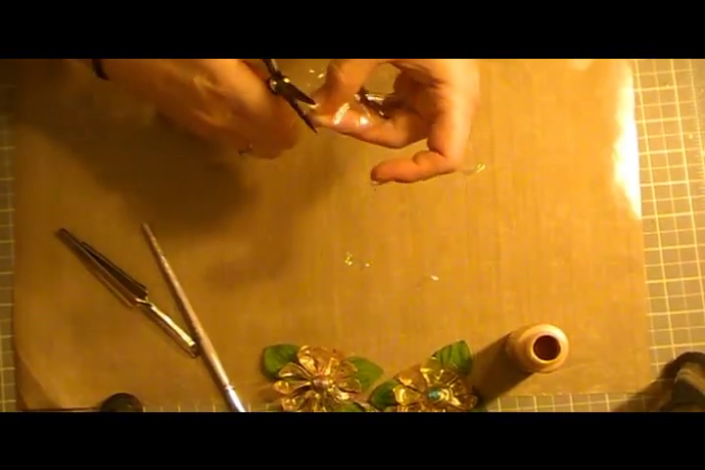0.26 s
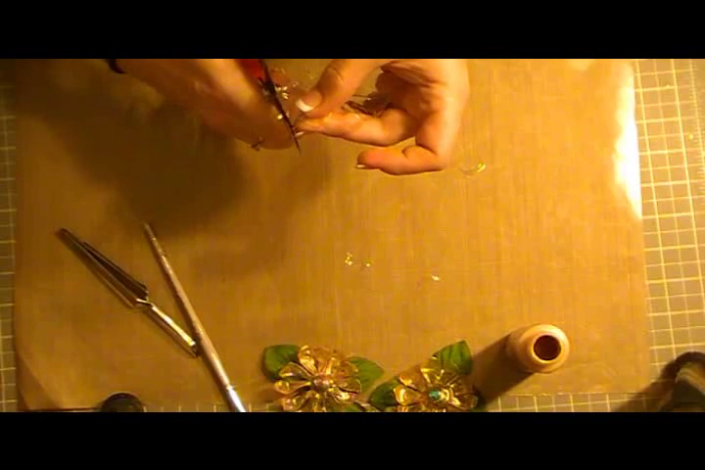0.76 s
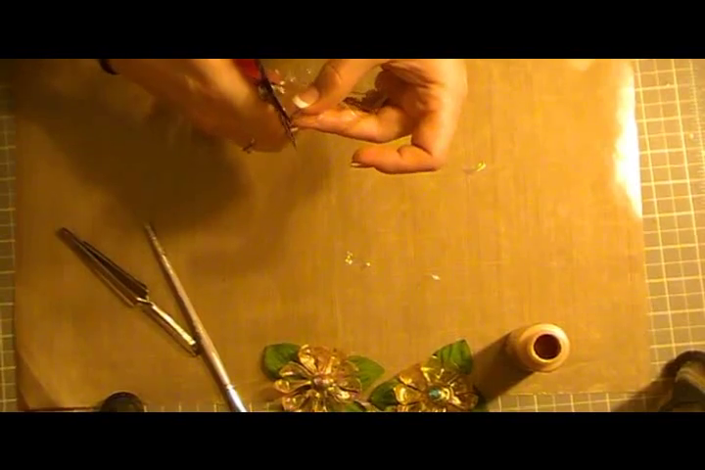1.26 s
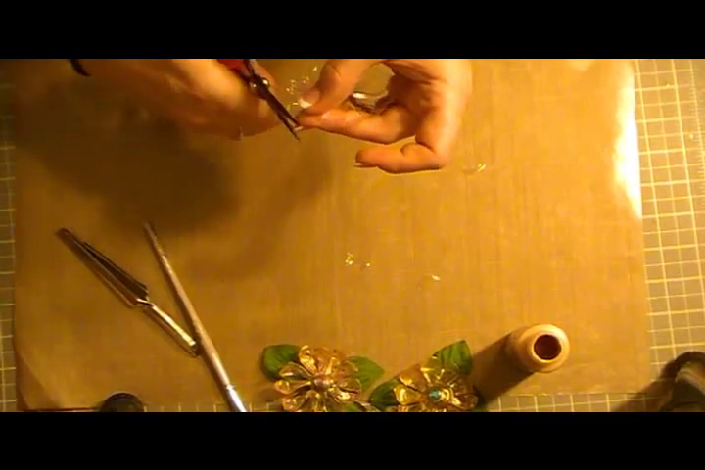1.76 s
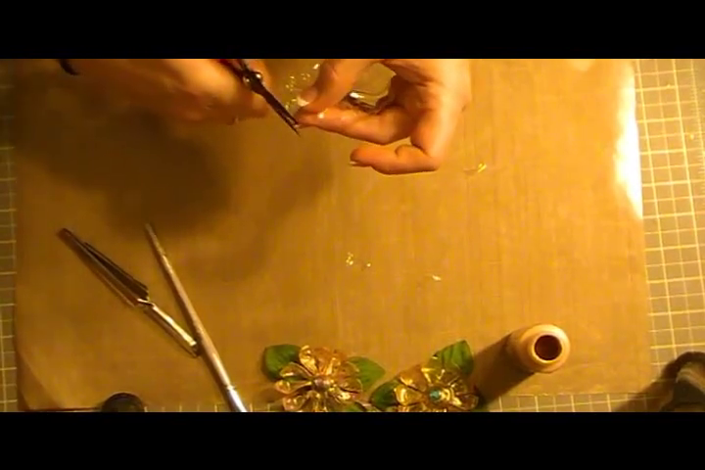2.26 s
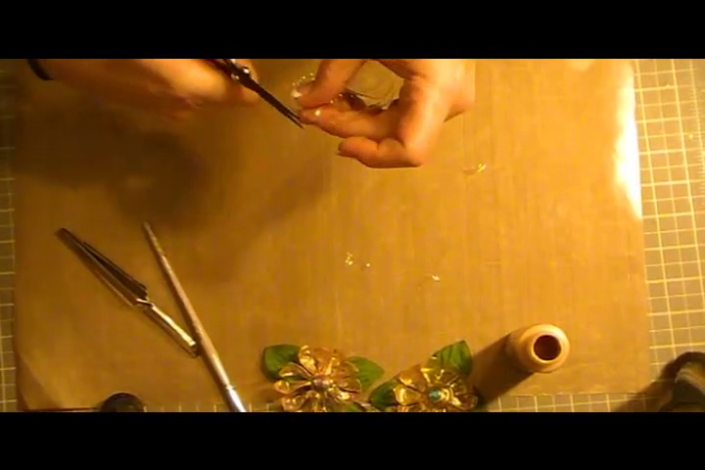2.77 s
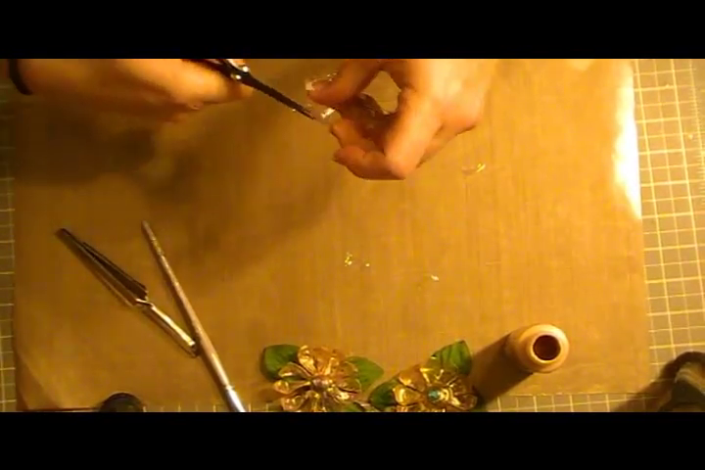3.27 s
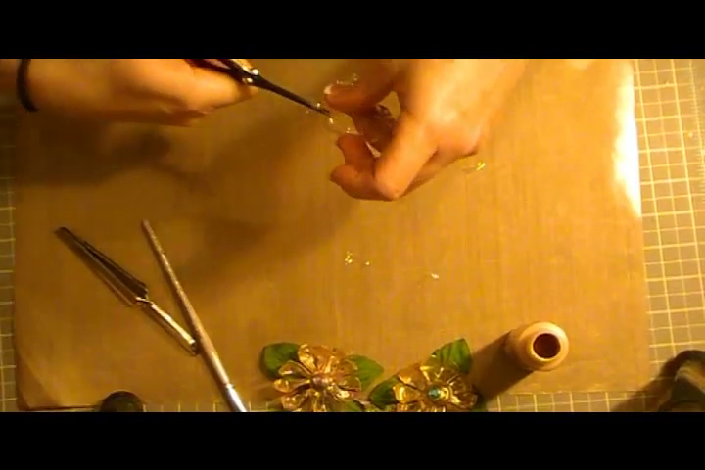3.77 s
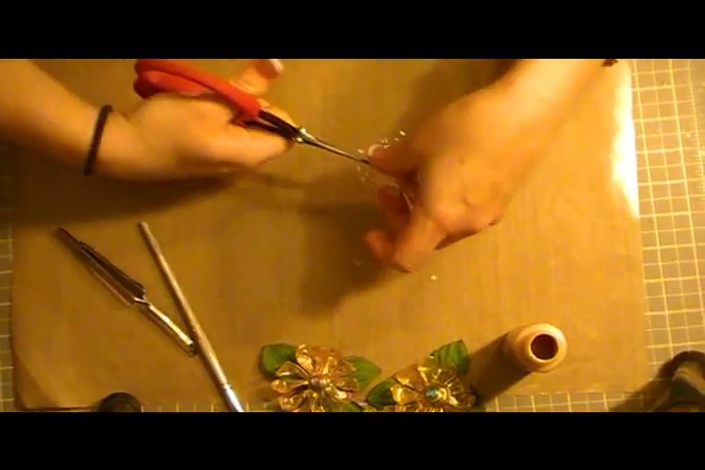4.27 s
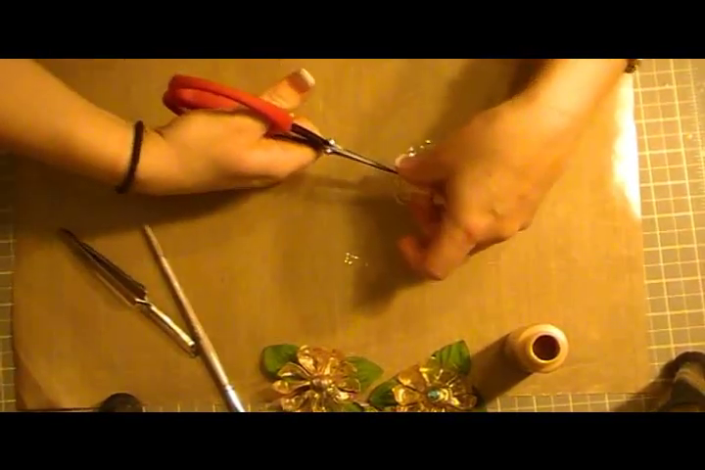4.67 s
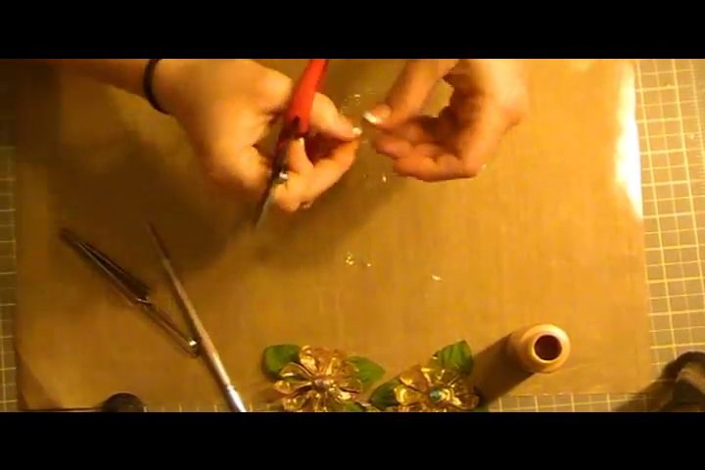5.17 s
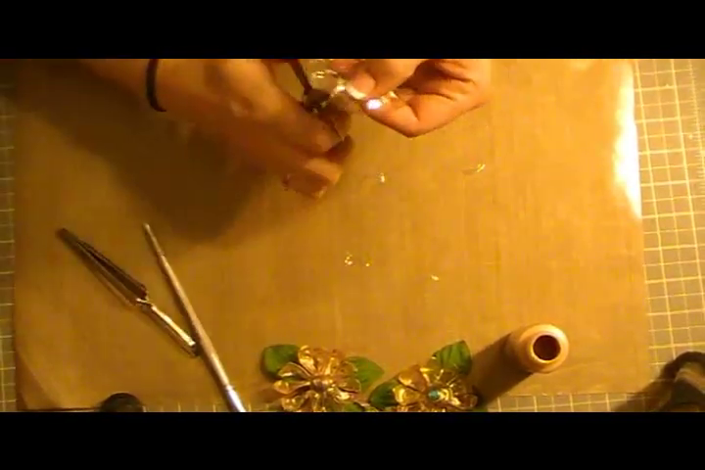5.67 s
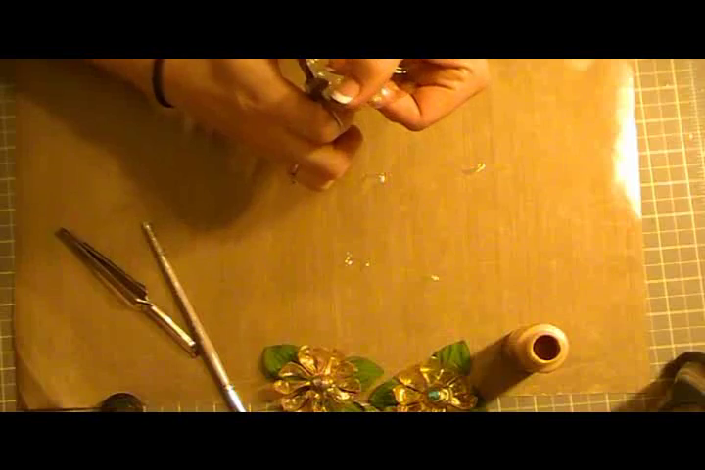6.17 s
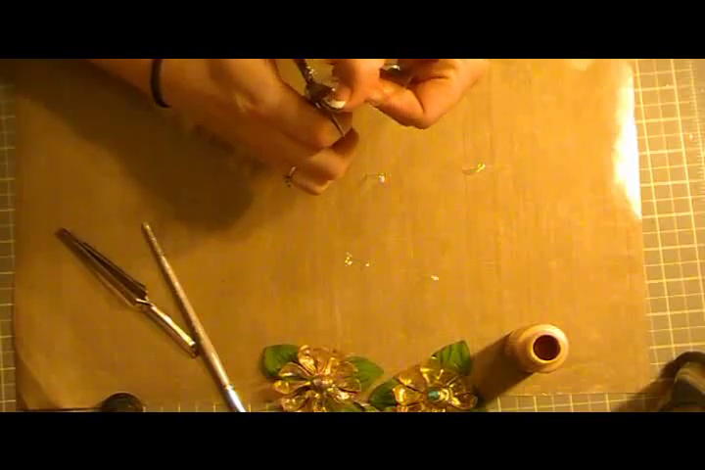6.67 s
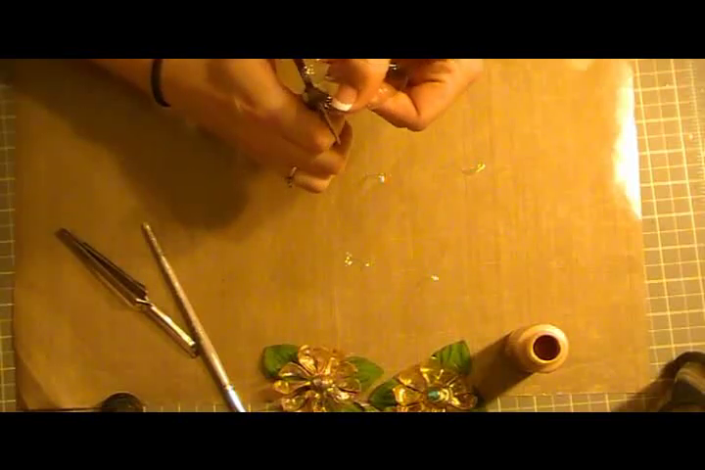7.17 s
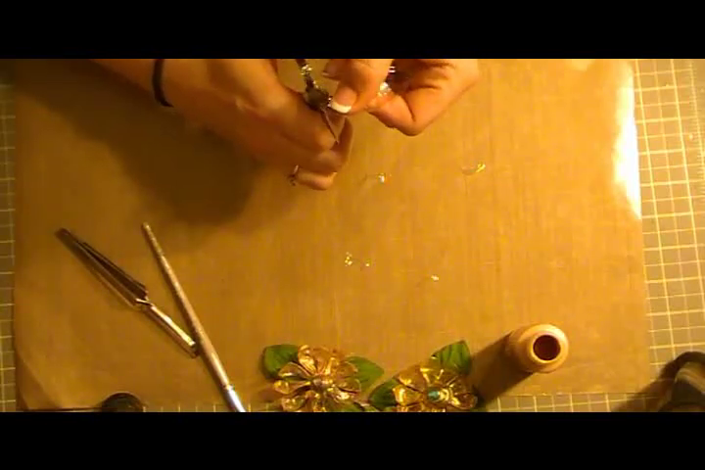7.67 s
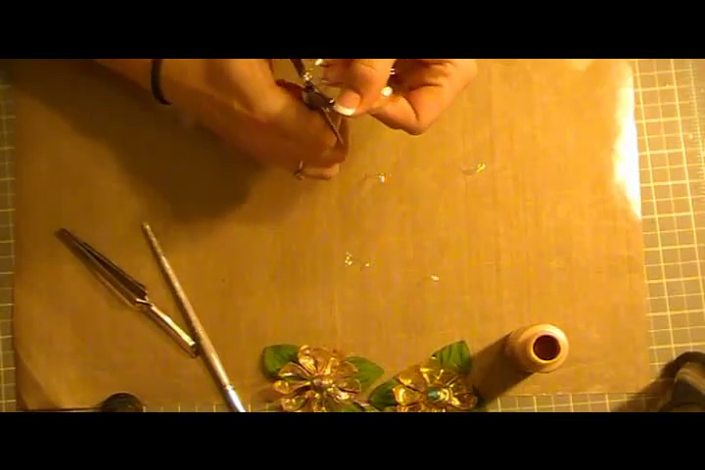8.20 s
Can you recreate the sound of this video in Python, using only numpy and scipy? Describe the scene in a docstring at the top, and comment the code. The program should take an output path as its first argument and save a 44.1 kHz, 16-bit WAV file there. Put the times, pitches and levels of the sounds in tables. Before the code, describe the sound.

Crisp plastic snaps and tiny blade crunches come in uneven clusters over soft hand rubs on a mat and steady room hiss.

```python
"""Sharp snaps of thin bottle plastic, cut with small scissors in the fingers above a work mat.
Each snap is a fracture of a few milliseconds at most that sets the held sheet ringing; harder cuts add a dull note.
Between snaps the blades crunch in trains of tiny slips, and the bent sheet gives faint ticks.
Everything from the cutting is reflected by the desk and near walls.
Below lie soft swells of noise from hands and arms on the mat, steady hiss and a low, unsteady hum."""
import sys
import numpy as np
from scipy import signal
from scipy.fft import rfft, irfft, next_fast_len
from scipy.io import wavfile
from scipy.ndimage import uniform_filter1d

SR = 44100
rng = np.random.default_rng(int(sys.argv[2]) if len(sys.argv) > 2 else 0)


def to_wav(s):
    """Save 16-bit WAV."""
    ch = np.atleast_2d(s).T  # columns
    pcm = np.round(np.clip(ch, -1, 1) * 32767)  # PCM
    wavfile.write(sys.argv[1], SR, pcm.astype(np.int16))


N = 372204
TIME = np.arange(N) / SR

# Room hiss common to both ears. Each row: frequency in Hz, relative density in dB per Hz.
HISS_MID_SPECTRUM = [(12, -43), (20, -4), (113, -2.5), (255, -6), (472, -8), (780, -9), (897, -10),
                     (1570, -14), (1910, -15), (3740, -16.5), (6180, -22), (9670, -22.5), (11100, -24),
                     (14300, -29.5), (16000, -34)]
# Room hiss opposed between the ears. Each row: frequency in Hz, relative density in dB per Hz.
HISS_SIDE_SPECTRUM = [(12, -41.5), (20, -14), (277, -7), (399, -10), (542, -9.5), (949, -13), (1570, -19.5),
                      (1760, -20), (2670, -24), (3440, -26.5), (5080, -28.5), (7520, -32), (16000, -39.5)]
HISS_MID_DB, HISS_SIDE_DB = -62.5, -57.5
HUM_HZ, HUM_DB = 94.8, -72.0

# Hands and arms rubbing on the mat. Each row: middle in seconds, length in seconds, pitch in Hz, level in dB.
MAT_RUBS = [(0.259, 0.5, 170, -71.5), (1.35, 0.43, 223, -66.5), (2.717, 0.25, 250, -62.5),
            (2.65, 0.37, 95.3, -62.5), (3.164, 0.2, 128, -61), (3.553, 0.18, 55, -64),
            (3.79, 0.17, 57.7, -63.5)]

# Reflections of the room. Each row: frequency in Hz, gain in dB.
WALL_REFLECTIONS = [(200, -3.5), (700, 5), (1500, -1), (3000, -3.5), (6000, -4.5), (10000, -2.5),
                    (13000, -8.5), (16000, -9)]

# Radiation of the sheet. Each row: frequency in Hz, relative density in dB per Hz.
SHEET_RADIATION = [(300, -10.5), (600, -11), (1200, -12), (1650, -1), (3000, -0.5), (5400, 3.5), (6500, -2),
                   (7800, 2), (11500, 3.5), (14000, 4.5), (16000, -18)]
# Resonances of the held sheet and blades, before each cut varies them.
# Each row: frequency in Hz, width in Hz, boost in dB.
HELD_MODES = [(565, 200, 6), (994, 130, 4.5), (1642, 190, 4.5), (1866, 28, -1), (2176, 100, 5),
              (2872, 200, 6.5), (3140, 161, 5), (3835, 480, 4.5), (4554, 210, 4), (5200, 65, -7.5),
              (7590, 160, 5), (8310, 200, 6), (9180, 160, 9.5), (10640, 150, 5.5), (11810, 270, 8)]

# Longer strokes of blades or fingertips along the edge.
# Each row: start in seconds, end in seconds, relative level in dB, tilt in dB per octave.
EDGE_STROKES = [(0.127, 0.196, -37.5, -3.5), (0.171, 0.26, -45.5, -4), (1.046, 1.095, -39.5, 2),
                (1.464, 1.522, -42.5, 4), (3.218, 3.293, -51.5, -3), (5.121, 5.179, -50, -2.5),
                (5.187, 5.244, -45.5, -2.5), (5.33, 5.436, -43, -1), (5.507, 5.594, -54, -4.5),
                (5.71, 5.773, -44.5, -4), (5.774, 5.868, -48.5, -6), (6.143, 6.268, -49, -4.5),
                (6.216, 6.247, -34, -1), (6.681, 6.788, -56, -4), (6.986, 7.047, -31.5, -6),
                (7.657, 7.7, -49.5, -6.5), (8.187, 8.311, -44.5, -7.5)]
# Slips come faster the harder the blades press: rate at the usual level, and the rise that doubles it.
SLIPS_PER_S, USUAL_SHEAR_DB, SLIPS_DOUBLE_DB = 1000, -44.5, 13
# The blades bite in just before each snap and crunch on after it: length, and level against the snap's row.
BITE_S, BITE_DB = 0.008, -23
RUN_ON_S, RUN_ON_DB = 0.028, -27.5

# In the harder cuts the whole sheet buckles. Each row: time in seconds, pitch in Hz, level in dB.
SHEET_BUCKLES = [(1.5098, 1600, -37.5), (3.21, 2070, -33), (3.21, 1020, -45.5), (4.5603, 1110, -36),
                 (6.248, 2210, -36.5), (6.4115, 486, -50), (1.5095, 2844, -30.5), (7.3915, 1770, -37),
                 (8.366, 560, -40.5), (8.367, 972, -35.5)]

# Snaps of the plastic.
# Each row: time in seconds, relative level in dB, tilt in dB per octave, main resonance in Hz.
PLASTIC_SNAPS = [(0.068, -38.5, 1, 5300), (0.086, -26.5, -1.5, 3750), (0.1616, -22, -3, 7300),
                 (0.1943, -30, 5, 13500), (0.205, -31, 4, 13700), (.241, -33.5, 9, 11300),
                 (0.257, -36, 2.5, 11200), (.506, -28.5, 2, 11500), (0.5309, -21, -2, 7700),
                 (.618, -27, -4, 4500), (0.9174, -33, 5, 11400), (1.0536, -25, 4, 8200),
                 (1.0577, -23, 3, 9400), (1.071, -14.5, 4.5, 11300), (1.0952, -26, 1, 3570),
                 (1.4478, -40, -1, 12700), (1.4794, -30.5, 4.5, 11600), (1.5078, -12.5, 2, 7600),
                 (1.5696, -33.5, 3.5, 11500), (1.8094, -46.5, -1, 2900), (1.848, -44.5, -6, 2820),
                 (1.8955, -21, -.5, 7100), (1.9154, -28, -1, 1730), (2.051, -43.5, 6, 3900),
                 (2.0815, -39.5, 2.5, 3300), (2.1926, -22.5, 4, 14100), (2.3032, -49, -1, 7640),
                 (2.7912, -42, -5, 3800), (2.8312, -42, 4, 3880), (2.982, -30, 3, 12600),
                 (3.0034, -39, 0.5, 12900), (3.121, -28.5, 0.5, 5360), (3.1968, -38, -4, 4580),
                 (3.21, -24, 0, 11000), (3.2684, -37, -1, 6900), (3.4614, -31, -3.5, 5030),
                 (3.521, -41, -2.5, 12500), (3.605, -37, -6, 7400), (3.7968, -35, -3.5, 6600),
                 (3.877, -35, -1.5, 1980), (3.963, -23.5, 6, 12600), (4.0708, -28, -2.5, 2700),
                 (4.2398, -42.5, -2.5, 7500), (4.3, -27.5, 1, 4500), (4.3444, -28, -1.5, 4800),
                 (4.4557, -38, -1.5, 4400), (4.5594, -17.5, 0.5, 2250), (4.6149, -22.5, 2.5, 2150),
                 (4.678, -41, -3, 5640), (4.7117, -28.5, -4.5, 2300), (4.7529, -30.5, 1.5, 6950),
                 (5.3403, -30.5, -3, 10700), (5.3732, -22, -2, 7060), (5.4144, -30.5, -5, 11100),
                 (5.4223, -33.5, -3.5, 7400), (5.6206, -20.5, -1.5, 13400), (5.674, -33, -11, 4000),
                 (5.711, -36.5, 0.5, 4400), (5.9868, -30, -7, 12500), (6.009, -24, 2, 4500),
                 (6.228, -30.5, -1.5, 2800), (6.2481, -12.5, 1.5, 9800), (6.256, -13.5, 2, 11300),
                 (6.4112, -15, 1, 12100), (6.4594, -40, -1, 11400), (6.494, -44, -2, 11100),
                 (6.5916, -25, 4.5, 13400), (6.5987, -17.5, 2, 13100), (6.8514, -26, 0, 2600),
                 (6.8778, -19, 0, 11900), (6.894, -20.5, 0, 6700), (7.0227, -26.5, -8.5, 3800),
                 (7.047, -21, -1.5, 5370), (7.2107, -42, -6.5, 3300), (7.362, -30, -1.5, 2830),
                 (7.3891, -18.5, -3.5, 9460), (7.4508, -43, -4, 1706), (7.6695, -37.5, 2.5, 4930),
                 (7.762, -13.5, 3, 9900), (7.81, -37.5, -2, 4600), (7.9223, -42, -4.5, 7250),
                 (7.9555, -15.5, 2, 7600), (8.1681, -34.5, -5.5, 7550), (8.2045, -25, -3.5, 3250),
                 (8.2352, -24, -4.5, 2800), (8.257, -25, -2.5, 5600), (8.268, -25.5, -4.5, 7900),
                 (8.3671, -11.5, -1, 5500), (8.4188, -39, .5, 3860)]
# After-ring of a usual snap, and what it loses in dB for each dB a harder snap spends in the crack.
USUAL_SNAP_DB, RING_DB, RING_LOSS = -32, -1, 0.12
LOWEST_NOTE_HZ = 428   # of the flap that lets go
# Pan is left minus right: crisp snaps lean right and dull ones left, with a spread by chance.
PAN_PER_TILT, PAN_SPREAD_DB = -0.28, 0.6
LEVEL_WINDOW_S = 0.002   # snap and buckle energies are levelled as if spread over this time

CUTOFF_HZ = 16500


def from_db(db):
    """Decibels to gain."""
    return 10 ** (np.asarray(db) / 20)


def rms_one(x):
    """Scale to unit rms."""
    return x / np.sqrt(np.mean(x ** 2) + 1e-20)


def energy_one(x):
    """Scale to unit energy per channel, averaged over the channels."""
    return rms_one(x) / np.sqrt(x.shape[-1])


def at_hz(points, hz):
    """Read a spectrum table on a log-frequency axis."""
    knots, db = np.transpose(points)
    return np.interp(np.log(hz), np.log(knots), db)


def add(track, s, sound):
    """Mix a sound into the track from time s on."""
    start = max(0, round(s * SR))
    track[:, start:start + sound.shape[-1]] += sound[:, :max(0, N - start)]


def coloured(x, db_at):
    """Causal (minimum-phase) filter with the gain db_at(Hz), built by folding the cepstrum."""
    size = 2 * next_fast_len(x.shape[-1] // 2 + 256)
    hz = np.maximum(np.fft.rfftfreq(size, 1 / SR), 10)
    cepstrum = irfft(np.log(from_db(db_at(hz))))
    cepstrum[1:size // 2] *= 2
    cepstrum[size // 2 + 1:] = 0
    response = np.exp(rfft(cepstrum))
    return irfft(rfft(x, size) * response, size)[..., :x.shape[-1]]


def stereo_noise(size, alike):
    """White noise whose two channels correlate by `alike`."""
    mid, side = rng.standard_normal((2, size))
    opposed = np.array([[1], [-1]])
    return np.sqrt((1 + alike) / 2) * mid + np.sqrt((1 - alike) / 2) * side * opposed


def band_noise(hz, ratio, alike):
    """Stereo noise from hz / ratio to hz * ratio, at unit rms."""
    band = signal.butter(2, [hz / ratio, hz * ratio], "band", fs=SR, output="sos")
    return rms_one(signal.sosfilt(band, stereo_noise(N, alike)))


def dying(t, t60):
    """Decay by 60 dB in t60 seconds."""
    return from_db(-60 * t / t60)


def background():
    """Steady hiss from common and opposed noise, with a narrow noise band as a low, unsteady hum."""
    mid = coloured(rng.standard_normal(N), lambda hz: at_hz(HISS_MID_SPECTRUM, hz))
    side = coloured(rng.standard_normal(N), lambda hz: at_hz(HISS_SIDE_SPECTRUM, hz))
    mid = from_db(HISS_MID_DB) * rms_one(mid)
    side = from_db(HISS_SIDE_DB) * rms_one(side)
    hum = from_db(HUM_DB) * band_noise(HUM_HZ, ratio=1.12, alike=0.96)
    return np.array([mid + side, mid - side]) + hum


def rubbing():
    """Skin dragging on the mat makes soft low swells of narrow-band noise."""
    out = np.zeros((2, N))
    for middle, length, hz, db in MAT_RUBS:
        swell = np.exp(-(2 * (TIME - middle) / length) ** 2)
        out += from_db(db) * swell * band_noise(hz, ratio=1.2, alike=0.22)
    return out


def room(x, t60=0.14, build_s=0.0089, wet_db=-10.0):
    """Reflections from the desk and near walls build up quickly and die soon."""
    t = np.arange(SR // 3) / SR
    build_up = 1 - np.exp(-(t / build_s) ** 2)
    echoes = stereo_noise(len(t), alike=0.055) * dying(t, t60) * build_up
    echoes = coloured(energy_one(echoes), lambda hz: at_hz(WALL_REFLECTIONS, hz))
    return from_db(wet_db) * signal.fftconvolve(x, echoes, axes=1)[:, :N]


def sheet_db(hz, tilt_db, lowest_hz, detune=0.037, uneven_db=6.5, tilt_from_hz=1600):
    """A small flap radiates weakly below its lowest note; a crisper break tilts the sound upward."""
    centre, width, boost_db = np.transpose(HELD_MODES)[..., None]
    # the grip retunes the sheet from cut to cut, and each cut favours other modes
    centre = centre * (1 + detune * rng.standard_normal(centre.shape))
    boost_db = boost_db + uneven_db * rng.uniform(-1.01, 1, centre.shape)
    peaks_db = (boost_db / (1 + (2 * (hz - centre) / width) ** 2)).sum(axis=0)
    slope_db = tilt_db * np.log2(np.maximum(hz, tilt_from_hz) / 5000)   # level below tilt_from_hz
    low_loss_db = 10 * np.log10(1 + (lowest_hz / hz) ** 6)
    return at_hz(SHEET_RADIATION, hz) + peaks_db + slope_db - low_loss_db


def snap(tilt_db, lowest_hz, main_hz, ring_db, tear_s=0.0017, rise_s=0.00016,
         main_db=8.5, main_octaves=0.22, ring_t60=0.036, uneven_db=3.0):
    """A crack runs unevenly for a millisecond or two, then the sheet rings out in dense short modes."""
    t = np.arange(3000) / SR

    def colour(hz):
        """The sheet's spectrum with a hump at the main resonance."""
        hump = np.exp(-(np.log2(hz / main_hz) / main_octaves) ** 2)
        return sheet_db(hz, tilt_db, lowest_hz) + main_db * hump

    wander = uniform_filter1d(rng.standard_normal(len(t)), size=14)
    jerks = from_db(uneven_db * rms_one(wander))
    # every crack starts and stops at its own pace
    onset = 1 - np.exp(-t / (rise_s * rng.uniform(0.13, 1.9)))
    stop = 1 + (t / (tear_s * rng.uniform(0.42, 1.63))) ** 8
    tear = stereo_noise(len(t), alike=0.77) * jerks * onset / stop
    ring = stereo_noise(len(t), alike=0.58) * dying(t, ring_t60)
    tear, ring = coloured(np.array([tear, ring]), colour)
    both = energy_one(tear) + from_db(ring_db) * energy_one(ring)
    return both * np.sqrt(LEVEL_WINDOW_S * SR)


def creaks(count=24, level_db=-51, spread_db=1.0, ring_db=-4.0, lowest_hz=900, reach_s=0.07):
    """The bent sheet gives faint ticks shortly before and after snaps, as the strain builds and settles."""
    out = np.zeros((2, N))
    for which, moment, size, crispness, place in rng.random((count, 5)):
        s = PLASTIC_SNAPS[int(which * len(PLASTIC_SNAPS))][0] + reach_s * (2 * moment - 1)
        main_hz = HELD_MODES[int(place * len(HELD_MODES))][0]
        tilt_db = 2 * (2 * crispness - 1)
        tick = snap(tilt_db, lowest_hz, main_hz, ring_db)
        add(out, s, from_db(level_db + spread_db * (2 * size - 1)) * tick)
    return out


def shearing(spread_db=6.0, slip_t60=0.0153, swell=0.5, lowest_hz=800, level_db=-4.0):
    """Blades advance in tiny uneven slips, each a faint crackle; pressure swells and fades over a stroke."""
    out = np.zeros((2, N))
    short = np.arange(900) / SR
    bites = [(s - BITE_S, s, db + BITE_DB, tilt_db) for s, db, tilt_db, _ in PLASTIC_SNAPS]
    run_ons = [(s, s + RUN_ON_S, db + RUN_ON_DB, tilt_db) for s, db, tilt_db, _ in PLASTIC_SNAPS]
    for start, end, db, tilt_db in EDGE_STROKES + bites + run_ons:
        slips_per_s = SLIPS_PER_S * 2 ** ((db - USUAL_SHEAR_DB) / SLIPS_DOUBLE_DB)
        size = round((end - start) * SR)
        pressure = np.sin(np.pi * (np.arange(size) + 0.5) / size) ** swell
        crunch = 0
        for place in range(6):   # slips at different places on the edge ring differently
            happens = rng.random(size) < slips_per_s / 6 / SR
            slips = happens * rng.choice([-1, 1], size)
            slips = slips * from_db(spread_db * np.minimum(rng.exponential(1, size), 3))
            crackle = stereo_noise(len(short), alike=0.54) * dying(short, slip_t60)
            crunch = crunch + signal.fftconvolve((slips * pressure)[None], crackle)
        crunch = coloured(crunch, lambda hz: sheet_db(hz, tilt_db, lowest_hz))
        add(out, start, from_db(level_db + db) * energy_one(crunch) * np.sqrt(size))
    return out


def buckles(cycles=27.0):
    """The sheet bends with a dull, short note that the fingers damp by 60 dB within `cycles` periods."""
    out = np.zeros((2, N))
    t = np.arange(3000) / SR
    for s, hz, db in SHEET_BUCKLES:
        note = np.sin(2 * np.pi * hz * t) * dying(t, cycles / hz)
        note = energy_one(note) * np.sqrt(LEVEL_WINDOW_S * SR)
        add(out, s, from_db(db) * note[None])
    return out


def snaps(level_db=-2.0):
    """Every snap at its moment, a little to the left or right; hard ones ring less for their crack."""
    out = np.zeros((2, N))
    for s, db, tilt_db, main_hz in PLASTIC_SNAPS:
        ring_db = RING_DB - RING_LOSS * (db - USUAL_SNAP_DB)
        lean_db = PAN_PER_TILT * tilt_db + PAN_SPREAD_DB * rng.standard_normal()
        pan_db = lean_db * np.array([[0.5], [-0.5]])
        crack = snap(tilt_db, LOWEST_NOTE_HZ, main_hz, ring_db)
        add(out, s, crack * from_db(level_db + db + pan_db))
    return out


def scene():
    """Cutting sounds with their reflections, over the quiet room."""
    cutting = snaps() + buckles() + shearing() + creaks()
    return cutting + room(cutting) + rubbing() + background()


def record(dry):
    """Cut the top steeply with an elliptic low-pass."""
    low_pass = signal.ellip(10, 0.2, 70, CUTOFF_HZ, fs=SR, output="sos")
    return signal.sosfilt(low_pass, dry)


dry = scene()
out = record(dry)
to_wav(out)
```